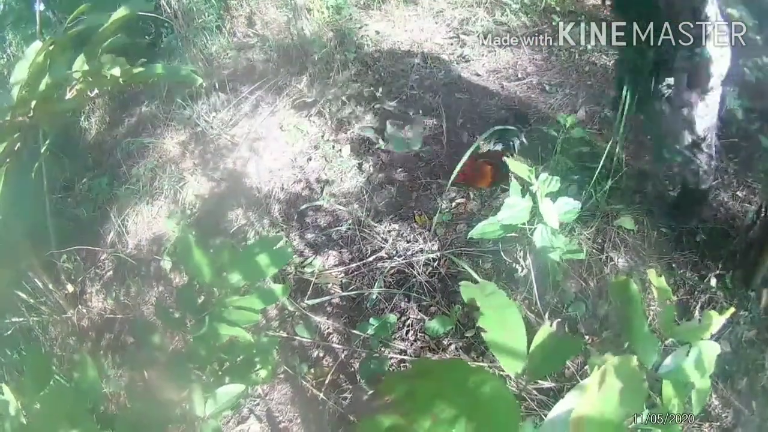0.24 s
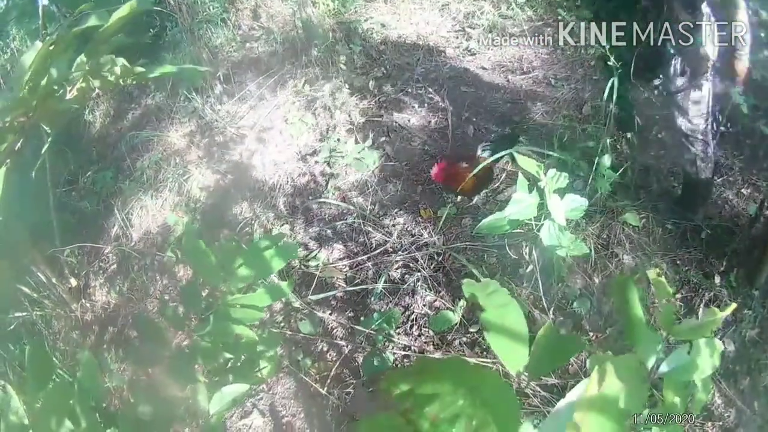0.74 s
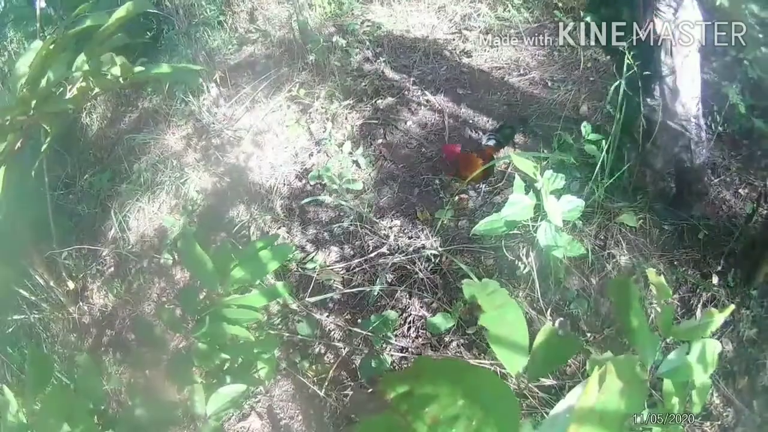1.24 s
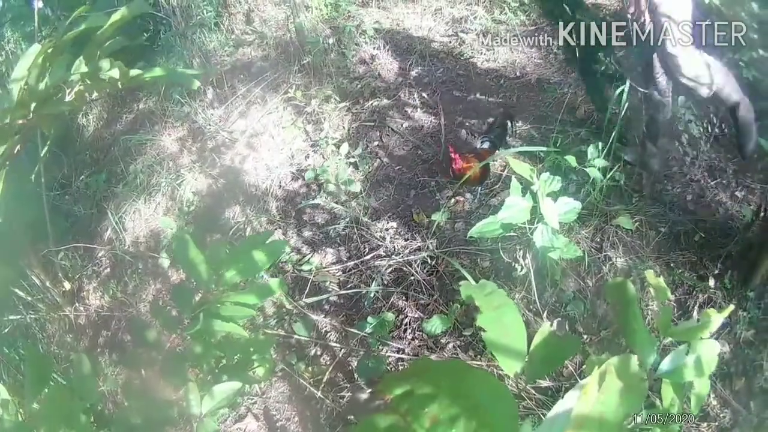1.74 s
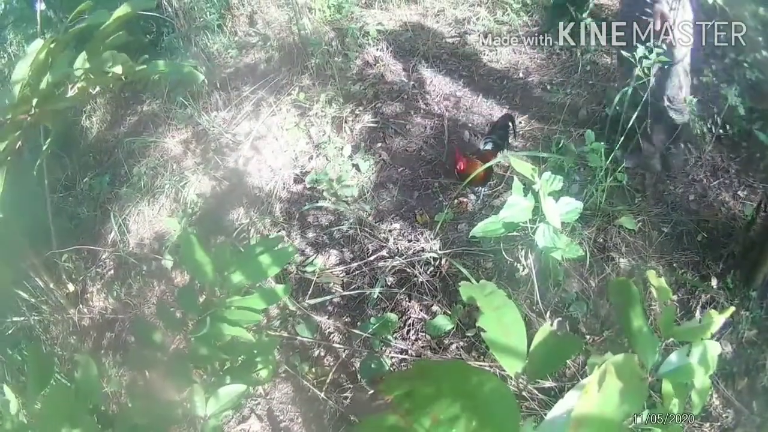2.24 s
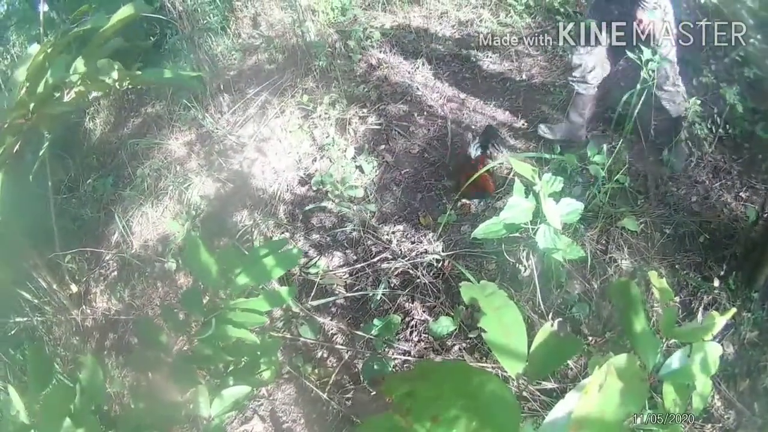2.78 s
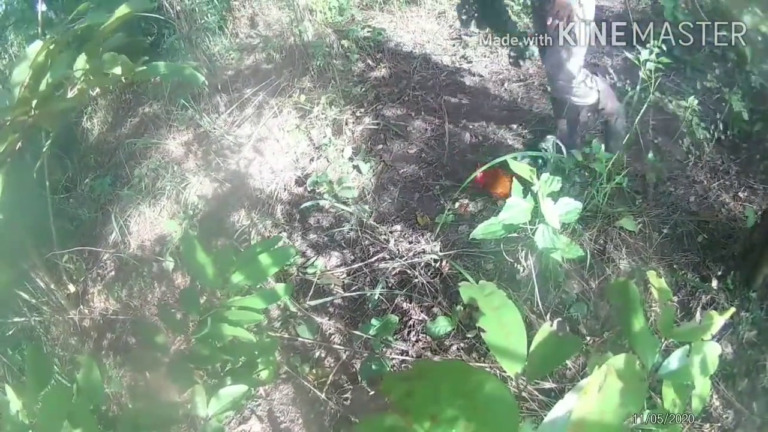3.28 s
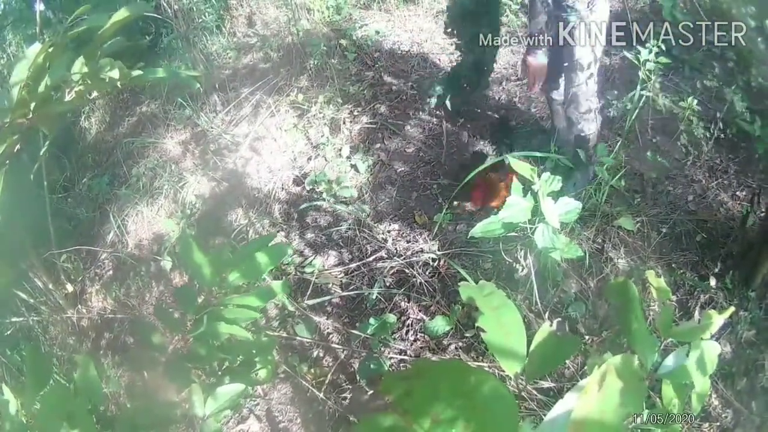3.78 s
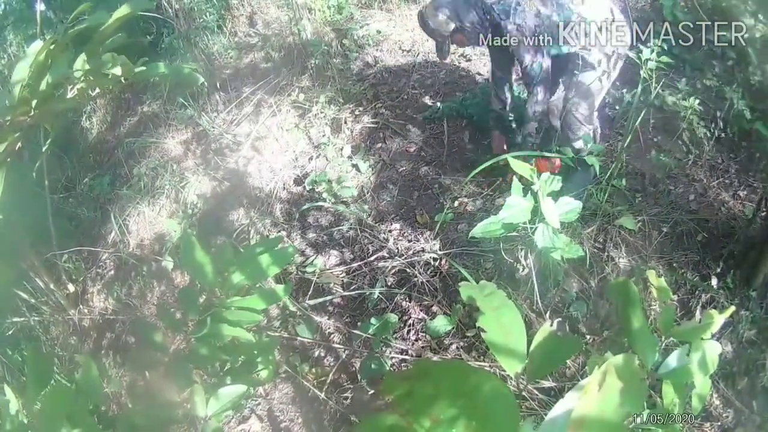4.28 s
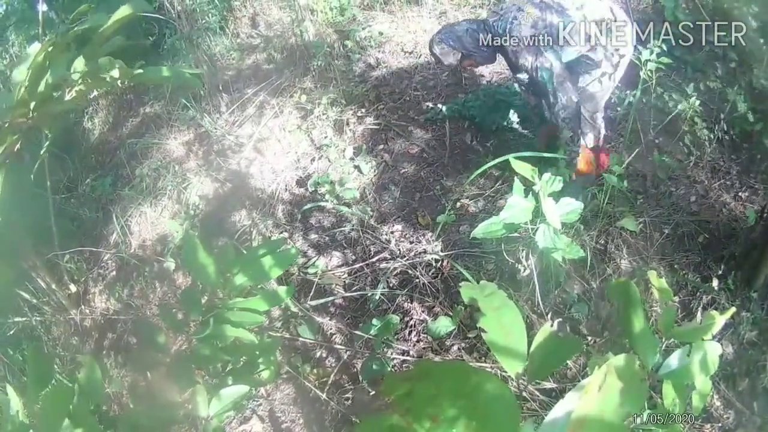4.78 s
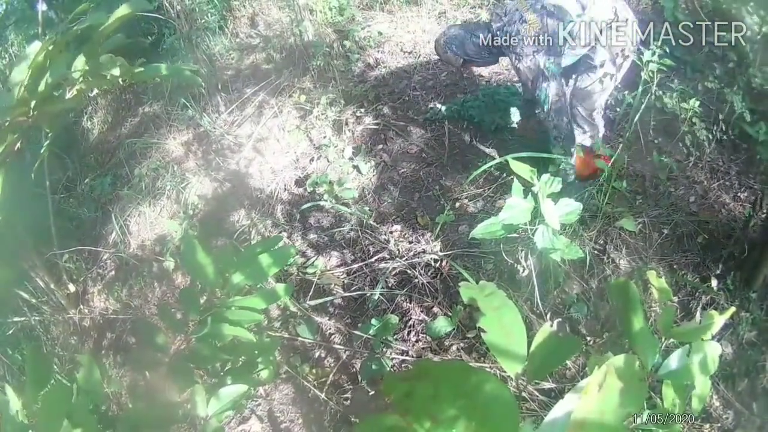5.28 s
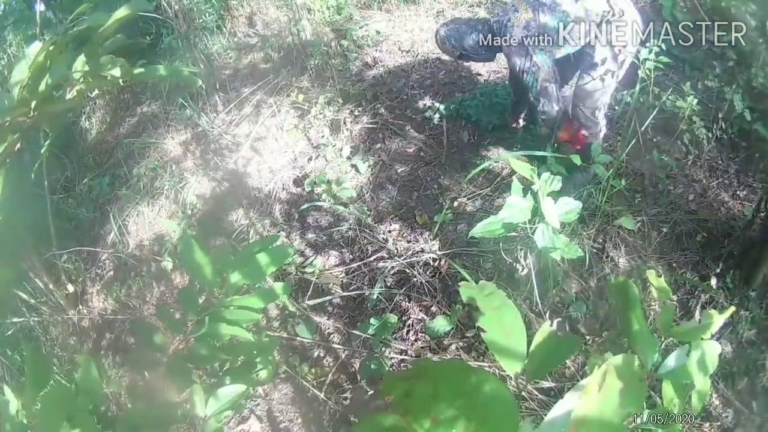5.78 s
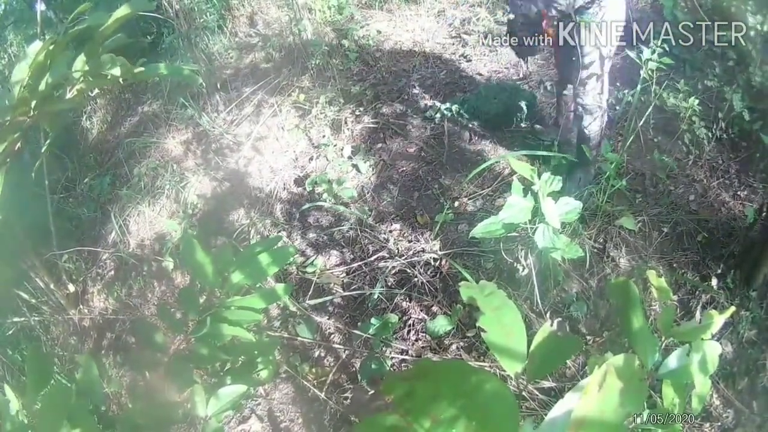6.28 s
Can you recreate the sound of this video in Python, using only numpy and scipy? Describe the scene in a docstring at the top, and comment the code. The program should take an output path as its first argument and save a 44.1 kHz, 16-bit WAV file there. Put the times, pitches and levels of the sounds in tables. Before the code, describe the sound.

In a quiet dry forest, close treads thud and snap twigs while leaf litter rustles. A rooster gives single low clucks, more frequent and slightly higher as the walker nears. A small bump, then a short harsh squawk with a falling, breaking whistle and low sputters. After a pause it groans in a rattle. A tiny insect chirps steadily, a far bird whistles faintly. Microphone near the ground, almost no echo.

```python
"""Jungle rooster on the forest floor

A rooster, voiced by uneven syrinx pulses ringing throat resonances, clucks on dry ground as someone walks up.
Grabbed by hand, it squawks: a breaking, falling whistle over a harsh buzz, with low sputters, then a rattling groan.
Treads, twigs and leaf litter are shaped noise; a faint insect and a far bird are wavering sine tones.
"""
import sys
import numpy as np
from scipy import signal
from scipy.fft import rfft, irfft, next_fast_len
from scipy.io import wavfile
from scipy.ndimage import uniform_filter1d, map_coordinates

SR = 44100
rng = np.random.default_rng(int(sys.argv[2]) if len(sys.argv) > 2 else 0)


def to_wav(s):
    """Save 16-bit WAV."""
    ch = np.atleast_2d(s).T  # columns
    pcm = np.round(np.clip(ch, -1, 1) * 32767)  # PCM
    wavfile.write(sys.argv[1], SR, pcm.astype(np.int16))


N = 287918

# throat resonance with the beak nearly shut, also behind the squawk's low voice: freq_hz [Hz], level_db [dB]
SHUT_THROAT = [(150, -40), (440, -28), (580, -9), (720, -2.5), (950, -7.5), (1140, -32), (1280, -55),
               (1410, -23.5), (1600, -45), (3000, -100)]
# dull spectrum of a blow on soil, before its pitch shift: freq_hz [Hz], level_db [dB]
THUD = [(60, -18.5), (200, -11.5), (330, -13.5), (480, 1.5), (640, 3), (850, -12), (1300, -56), (3000, -56),
        (8000, -78.5)]
# spectrum of snapping dry twigs: freq_hz [Hz], level_db [dB]
SNAP = [(400, 2), (900, 5.5), (1350, 9.5), (1650, -1.5), (2100, -3.5), (2900, -27), (4200, -20.5),
        (8000, -67)]
# bright spectrum of dry leaves: freq_hz [Hz], level_db [dB]
LEAVES = [(700, 3), (1100, 8.5), (1650, 3), (2150, 6.5), (2800, -6.5), (3400, -6.5), (4250, 3), (5100, -15),
          (6300, -7), (7800, -20), (11000, -33)]


def clucks():
    """The throat resonance of each cluck climbs with growing alarm and an opening beak; loud clucks are deeper."""
    # start_s [s], length_s [s], level_db [dB], pitch_hz [Hz, before the glide], rasp_db [dB against the voice]
    calls = [(.659, .04, -37, 275, -27.5), (1.676, .042, -35, 236, -26.5), (1.85, .045, -30, 347, -26),
             (2.73, .041, -34, 248, -26.5), (2.916, .04, -28.5, 350, -24), (3.126, .048, -34.5, 342, -14),
             (3.374, .05, -32.5, 377, -25), (3.613, .05, -34, 346, -22), (3.784, .049, -28.2, 364, -29),
             (3.99, .052, -34, 402, -19.5), (4.446, .04, -31, 259, -27)]
    calm_hz, alarm_hz_per_s = 735, 17
    open_beak_hz, loud_drop_hz = 130, 2900  # per unit of rasp gain and of cluck gain
    out = np.zeros(N)
    for start_s, length_s, level_db, pitch_hz, rasp_db in calls:
        throat_hz = calm_hz + alarm_hz_per_s * start_s
        throat_hz += open_beak_hz * amp(rasp_db) - loud_drop_hz * amp(level_db)
        add(out, start_s, amp(level_db) * cluck(length_s, pitch_hz, throat_hz, rasp_db))
    return out


def cluck(length_s, pitch_hz, throat_hz, rasp_db):
    """A cluck starts as a slow creak, tightens to its top pitch as it swells, and shuts."""
    # throat resonance with the beak open, before shift and sharpening: freq_hz [Hz], level_db [dB]
    open_throat = [(100, -41), (320, -16), (470, -17.5), (600, 2.5), (700, 2), (800, -2), (930, -12),
                   (1100, -23.5), (1400, -37), (2200, -70.5), (4000, -110)]
    progress = clock(length_s) / length_s
    glide = np.interp(progress, [0, .35, .65, 1], [.68, .79, 1.03, .9])
    pulses, flow = syrinx(pitch_hz * glide, jitter=.083, scatter_db=4.5)
    # a harsh cluck opens the beak wider, which damps and flattens the throat resonance
    sharpness = np.clip(1.05 - 1.55 * amp(rasp_db), .55, 1.2)
    voice = throat(pulses, np.array(open_throat) * [1, sharpness], shift=throat_hz / 700, hold_s=.0067)
    harsh = rasp(pulses, flow, breath_db=-5, shift=.98 * np.exp(rng.normal(0, .025)))
    swell = np.interp(progress, [0, .25, .5, .75, 1], [.24, .67, 1.26, .9, .2])
    return swell * (voice + amp(rasp_db) * harsh)


def squawk():
    """One side of the syrinx whistles, the other buzzes; both slacken at the break, and a grunt shuts the call."""
    start_s, length_s, ring_s = 4.688, .267, .08
    break_after_s, break_length_s, recover_s = .052, .012, .135
    whistle_hz, broken_hz, sag_hz_per_s = 1700, 1515, 780
    whistle_db, clearing_db_per_s, whistle_slack_db = -43, 36, 10
    rasp_db, rasp_fade_db_per_s, rasp_slack_db = -40.5, 11, 8.5
    throat_db, grunt_db, grunt_s = -37.5, -37, 4.927
    out, t = np.zeros(N), clock(length_s + ring_s)
    n = len(t)

    since_break = np.maximum(t - break_after_s, 0)
    broken = np.minimum(since_break / break_length_s, 1)
    slack = broken * np.maximum(1 - since_break / recover_s, 0)

    pitch_hz = whistle_hz + broken * (broken_hz - whistle_hz) - sag_hz_per_s * since_break
    whistle = tone(pitch_hz * (1 + .015 * wobble(n, 350))) * amp(wobble(n, 180))
    # the membranes flap unevenly at half the whistle's pitch
    flaps, _ = syrinx(pitch_hz / 2, jitter=.158, scatter_db=3.5)
    voice = throat(flaps, SHUT_THROAT, shift=1, hold_s=.015)

    # the buzz tightens while the whistle falls, so its upper harmonics climb
    buzz, flow = syrinx(np.geomspace(385, 436, n), jitter=.02, scatter_db=2)
    taut = rasp(buzz, flow, breath_db=-5)
    loose = rasp(buzz, flow, breath_db=-5, shift=.93)
    # the upper resonances sink at the break and climb back with the effort
    harsh = unit(np.sqrt(1 - slack) * taut + np.sqrt(slack) * loose)

    # the buzz recovers first; the whistle comes back late, and clearer than it began
    whistle_gain = amp(whistle_db + clearing_db_per_s * t - whistle_slack_db * np.sqrt(slack))
    rasp_gain = amp(rasp_db - rasp_fade_db_per_s * t - rasp_slack_db * slack ** 2)
    push = envelope(t, length_s, attack_s=.008, release_s=.05) ** 2
    add(out, start_s, push * (whistle_gain * whistle + rasp_gain * harsh))
    voice_push = envelope(t, t[-1], attack_s=.008, release_s=.11) ** 2
    add(out, start_s, amp(throat_db) * voice_push * voice)
    grunt = cluck(length_s=.021, pitch_hz=209, throat_hz=580, rasp_db=-19)
    add(out, grunt_s, amp(grunt_db) * grunt)
    return out


def sputters():
    """The low voice breaks through around the squawk in short, nearly pure bursts."""
    # start_s [s], level_db [dB]
    bursts = [(4.65, -38.5), (4.704, -21), (4.723, -23.5), (4.762, -24), (4.798, -28), (4.813, -23.5),
              (4.835, -24), (4.852, -24)]
    length_s, pitch_hz = .018, 710
    out, n = np.zeros(N), len(clock(length_s))
    for start_s, level_db in bursts:
        burst = tone(pitch_hz * (1 + .025 * wobble(n, 300)))
        add(out, start_s, amp(level_db) * signal.windows.tukey(n, .85) * burst)
    return out


def groan():
    """With the beak nearly shut, slow uneven pulses rattle the low resonance, quickening through each syllable."""
    # start_s [s], length_s [s], level_db [dB]
    syllables = [(5.525, .035, -52), (5.576, .013, -31), (5.593, .078, -31.8), (5.675, .094, -34)]
    rattle_hz, rattle_rise_hz_per_s = 110, 750
    air_db, hiss_db = 0, -31  # against the pulses, and against the voice
    out = np.zeros(N)
    for start_s, length_s, level_db in syllables:
        t = clock(length_s)
        pulses, flow = syrinx(rattle_hz + rattle_rise_hz_per_s * t, jitter=.15, scatter_db=2)
        # a little air escapes with each pulse
        air = unit(flow * rng.standard_normal(len(t)))
        voice = throat(unit(pulses) + amp(air_db) * air, SHUT_THROAT, shift=.95, hold_s=.012)
        # the narrow gap of the beak favours the highest resonances
        hiss = unit(np.gradient(rasp(pulses, flow, breath_db=15.5, shift=.95)))
        gain = amp(level_db) * envelope(t, length_s, attack_s=.016, release_s=.012)
        add(out, start_s, gain * (voice + amp(hiss_db) * hiss))
    return out


def syrinx(rate_hz, jitter, scatter_db):
    """Uneven pulses at the given rate, and the air flow that opens with each and dies away."""
    n = len(rate_hz)
    cycles = np.cumsum(rate_hz * np.exp(jitter * wobble(n, 300))) / SR + .8
    onsets = np.diff(np.floor(cycles), prepend=0)
    pulses = onsets * amp(scatter_db * wobble(n, 397.3))
    return pulses, np.exp(-2 * (cycles % 1))


def throat(pulses, spectrum, shift, hold_s):
    """Pulses ring the throat; steady breath evens out their power over the hold time."""
    voice = unit(shaped(pulses, spectrum, shift))
    power = np.abs(uniform_filter1d(voice ** 2, int(hold_s * SR) + 1))
    return unit(voice / np.sqrt(power + .11))


def rasp(pulses, flow, breath_db, shift=1):
    """The upper resonances, struck by the pulses and blown by air that comes in puffs."""
    # upper resonances before the shift: freq_hz [Hz], level_db [dB]
    resonances = [(300, -50.5), (900, -6), (1250, -4.5), (1450, -3.5), (1950, 4), (2330, 2), (2720, -17),
                  (3000, -9), (3350, -9), (3700, -3.5), (3950, -1), (4300, 2.5), (4650, -8), (5150, -35),
                  (5800, -19.5), (7400, -36), (10500, -59.5)]
    air = unit(flow * rng.standard_normal(len(flow)))
    return unit(shaped(unit(pulses) + amp(breath_db) * air, resonances, shift))


def grab():
    """The hand flicks a dry leaf, one brief, bright scratch, and bumps the ground with a decaying thud."""
    scratch_s, scratch_db = 4.536, -64
    bump_s, bump_db, bump_hz, bump_t60_s = 4.545, -26, 540, .036
    out, n = np.zeros(N), len(clock(.026))
    scratch = unit(shaped(rng.standard_normal(n), LEAVES, shift=1.6))
    add(out, scratch_s, amp(scratch_db) * np.hanning(n) * scratch)
    t = clock(bump_t60_s)
    add(out, bump_s, amp(bump_db - 60 * t / bump_t60_s) * soil(len(t), bump_hz))
    return out


def steps():
    """Each tread is a dull thud on the soil with a shorter snap of dry twigs."""
    # start_s [s], thud_db [dB], snap_db [dB], thud_t60_s [s]
    treads = [(.196, -29, -51, .018), (.37, -29, -51, .035), (.403, -33, -39, .1), (.577, -33, -42.5, .07),
              (.762, -33, -40.5, .1), (.832, -40, -51, .08), (1.079, -39, -57, .07),
              (2.191, -33, -41.5, .08), (2.646, -35, -42.5, .095), (4.259, -39, -41.5, .08)]
    out, t = np.zeros(N), clock(.5)
    for start_s, thud_db, snap_db, thud_t60_s in treads:
        thud = amp(thud_db - 60 * t / thud_t60_s) * soil(len(t), 535)
        snap = amp(snap_db - 60 * t / (.54 * thud_t60_s)) * noise(SNAP, len(t))
        onset = 1 - np.exp(-t / (.033 * thud_t60_s))
        add(out, start_s, (thud + snap) * onset)
    return out


def scuff():
    """One boot drags on the soil: a deep heel and a lighter sole, held rather than decaying like a tread."""
    start_s, length_s = 2.123, .062
    out, t = np.zeros(N), clock(length_s)
    for level_db, pitch_hz in [(-43, 300), (-42, 490)]:  # heel, sole
        drag = envelope(t, length_s, attack_s=.008, release_s=.04) * soil(len(t), pitch_hz)
        add(out, start_s, amp(level_db) * drag)
    return out


def soil(size, pitch_hz):
    """Noise with the dull colour of struck soil, its spectrum moved from about 550 Hz to the given pitch."""
    return unit(shaped(rng.standard_normal(size), THUD, pitch_hz / 550))


def twigs():
    """A dry twig cracks on its own: snap noise that dies at once."""
    # start_s [s], level_db [dB]
    breaks = [(.439, -36.5), (1.306, -44), (2.24, -45), (2.307, -40.5)]
    t60_s = .022
    out, t = np.zeros(N), clock(2 * t60_s)
    for start_s, level_db in breaks:
        add(out, start_s, amp(level_db - 60 * t / t60_s) * noise(SNAP, len(t)))
    return out


def leaf_litter():
    """Stirred litter rustles low, hisses in the leaves and crackles with sparse random impulses."""
    # how much the litter is stirred: time_s [s], rustle_db [dB, before trim and flicker]
    stirring = [(0, -45), (.55, -53.5), (1.55, -61.5), (2.2, -54.5), (3.1, -59), (4.5, -60), (5.1, -64),
                (6.53, -66.5)]
    # low body of the rustle: freq_hz [Hz], level_db [dB]
    litter = [(150, -5.5), (300, -3.5), (450, 0), (610, 9), (720, 1), (900, -21), (1400, -65.5),
              (2500, -63.5)]
    out = np.zeros(N)
    low_db, = curves(stirring)
    hiss_db = -23 + .72 * low_db  # shared reference for hiss and crackle, trimmed below
    n = len(low_db)
    shifting_db = 2.2 * wobble(n, 30) + 2.8 * wobble(n, 130)
    add(out, 0, amp(low_db - .5 + shifting_db) * noise(litter, n))
    flicker_db = 1.6 * wobble(n, 25) + 1.1 * wobble(n, 300)
    add(out, 0, amp(hiss_db - 3.5 + flicker_db) * noise(LEAVES, n))
    cracks = (rng.random(n) < 90 / SR) * rng.standard_normal(n)  # about 90 a second
    add(out, 0, amp(hiss_db - 18.5) * unit(shaped(cracks, SNAP)))
    return out


def forest(x):
    """Trunks and foliage scatter a faint tail: noise whose decay time depends on frequency."""
    # freq_hz [Hz], t60_s [s]
    decay = [(200, 0.34), (700, 0.32), (2000, 0.31), (6000, 0.19)]
    hz, t, z = signal.stft(rng.standard_normal(SR // 2), SR, nperseg=256)
    fade = amp(-60 * t / along(decay, hz)[:, None])
    tail = signal.istft(z * fade, SR, nperseg=256)[1]
    return signal.fftconvolve(x, tail / np.linalg.norm(tail))[:N]


def far_bird():
    """Another bird whistles faintly and brokenly among the trees: a wavering, fluttering sine."""
    # start_s [s], length_s [s], peak_db [dB, before flutter]
    notes = [(4.08, .22, -70), (5.88, .09, -72)]
    pitch_hz, waver_hz, flutter_db = 1930, 45, 4
    out = np.zeros(N)
    for start_s, length_s, peak_db in notes:
        n = len(clock(length_s))
        note = tone(pitch_hz + waver_hz * wobble(n, 120)) / np.sqrt(2)
        gain = amp(peak_db + flutter_db * wobble(n, 70))
        add(out, start_s, gain * signal.windows.tukey(n, .5) * note)
    return out


def insect():
    """Tiny falling chirps, about three a second, that slowly tire: the gaps lengthen."""
    first_s, gap_s, slowing_s, scatter_s = .175, .329, .001, .008
    level_db, centre_hz, fall_hz, length_s = -63, 4330, 300, .016
    out, t = np.zeros(N), clock(length_s)
    n = len(t)
    for k in range(19):
        middle_s = first_s + k * (gap_s + slowing_s * k) + rng.normal(0, scatter_s)
        chirp = tone(centre_hz + fall_hz * (.5 - t / length_s) + 70 * wobble(n, 450))
        gain = amp(level_db + rng.normal(0, .4))
        add(out, middle_s - length_s / 2, gain * np.hanning(n) * chirp)
    return out


def still_air():
    """The steady rumble and hiss of the still air, as coloured noise."""
    # freq_hz [Hz], level_db [dB]
    air = [(12, -43), (20, -0.5), (59, -3.5), (106, -5), (185, -10), (259, -17), (362, -23.5), (491, -20.5),
           (534, -31.5), (958, -32), (1770, -40), (3350, -43), (4310, -36), (5380, -47.5), (15500, -46)]
    return amp(-58) * noise(air, N)


def amp(db):
    """Decibels to gain."""
    return 10 ** (np.asarray(db) / 20)


def unit(x):
    """Scale to rms 1."""
    return x / np.sqrt(np.mean(x ** 2) + 1e-20)


def along(points, hz):
    """(Hz, value) points read on a log frequency axis."""
    f, v = np.transpose(points)
    return np.interp(np.log(hz + 1), np.log(f), v)


def clock(length_s):
    """Sample times of a sound of this length."""
    return np.arange(int(length_s * SR)) / SR


def curves(rows):
    """Each column of a table after its times, sample by sample over its own span."""
    s, *cols = np.transpose(rows)
    return [np.interp(s[0] + clock(s[-1] - s[0]), s, c) for c in cols]


def add(track, start_s, x, edge_s=.0018):
    """Mix x into the track at its start time, with soft ends."""
    part = track[max(0, int(start_s * SR)):][:len(x)]
    soft = x * signal.windows.tukey(len(x), 2 * edge_s * SR / len(x))
    part += soft[:len(part)]


def envelope(t, length_s, attack_s, release_s):
    """Gain that rises, holds and falls to nothing at the given length."""
    return np.clip(np.minimum(t / attack_s, (length_s - t) / release_s), 0, 1)


def wobble(size, rate):
    """A smooth random curve, rate knots a second."""
    knots = rng.standard_normal(4096)
    return map_coordinates(knots, [np.arange(size) * rate / SR], mode="wrap")


def tone(pitch_hz):
    """A sine of rms about 1 that follows a pitch curve."""
    return np.sqrt(2) * np.sin(2 * np.pi * np.cumsum(pitch_hz) / SR)


def filtered(x, response):
    """x times a response of frequency."""
    m = next_fast_len(len(x) + SR // 10)
    return irfft(rfft(x, m) * response(np.fft.rfftfreq(m, 1 / SR)), m)[:len(x)]


def noise(spectrum, size):
    """Coloured noise of rms 1."""
    return unit(filtered(rng.standard_normal(size), lambda f: amp(along(spectrum, f))))


def shaped(x, spectrum, shift=1):
    """x rings through a causal minimum-phase filter with this spectrum, its frequencies times shift."""
    size = 4096
    gain = amp(along(spectrum, np.fft.rfftfreq(size, 1 / SR) / shift))
    # folding the cepstrum onto positive time puts the filter's energy as early as possible
    cepstrum = irfft(np.log(gain))
    cepstrum[1:size // 2] *= 2
    cepstrum[size // 2 + 1:] = 0
    return signal.fftconvolve(x, irfft(np.exp(rfft(cepstrum))))[:len(x)]


def scene():
    """The bird and the walker with their forest tail, over litter, air, insect and far bird."""
    bird = clucks() + squawk() + sputters() + groan()
    walker = grab() + steps() + scuff() + twigs()
    near = bird + walker
    background = leaf_litter() + far_bird() + insect() + still_air()
    return (near + amp(-21.5) * forest(near) + background)[None]


def record(dry):
    """A sharp band limit keeps nothing from 15550 Hz up."""
    return np.array([filtered(x, lambda f: f < 15550) for x in dry])


dry = scene()
out = record(dry)
to_wav(out)
```